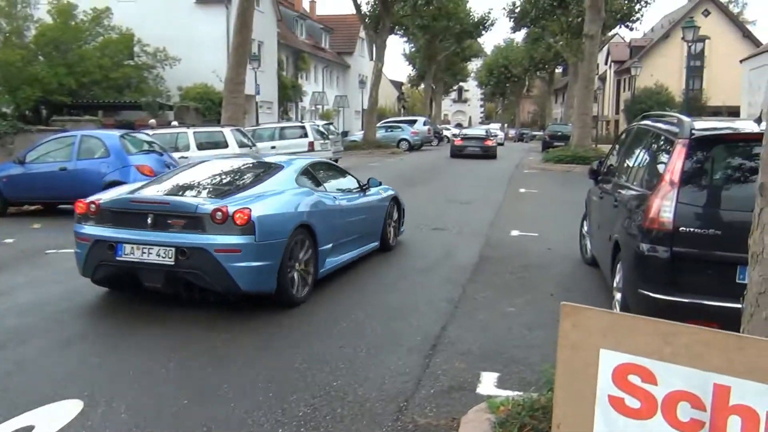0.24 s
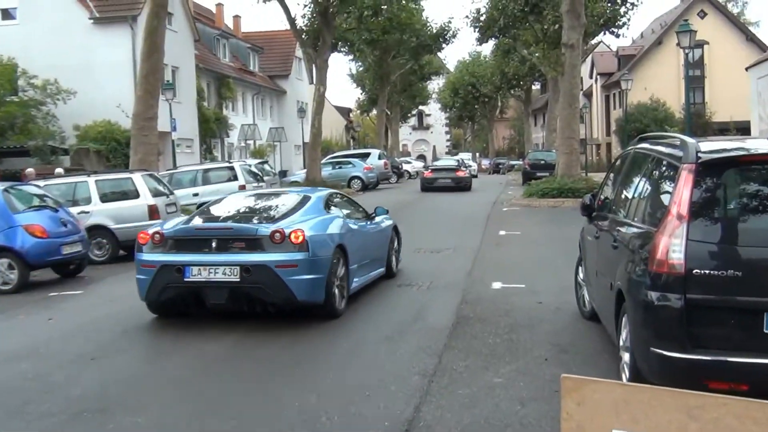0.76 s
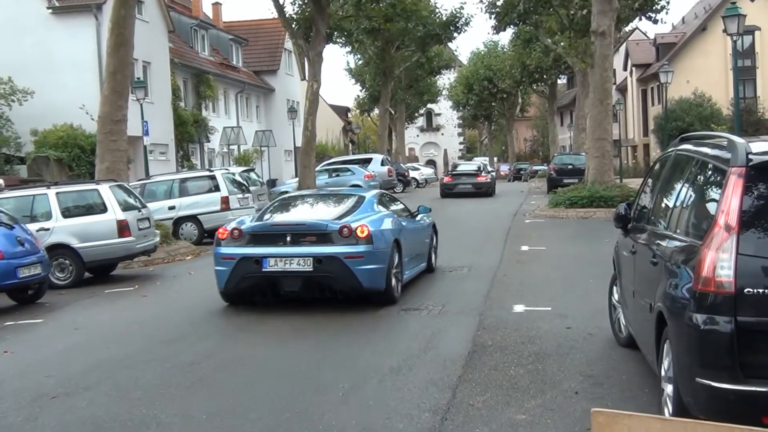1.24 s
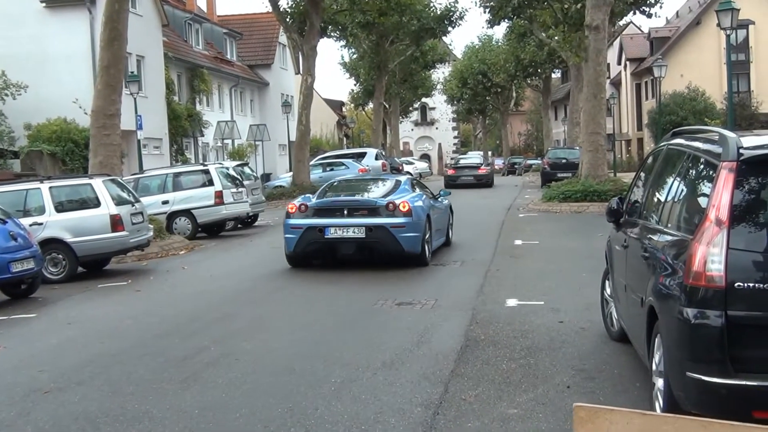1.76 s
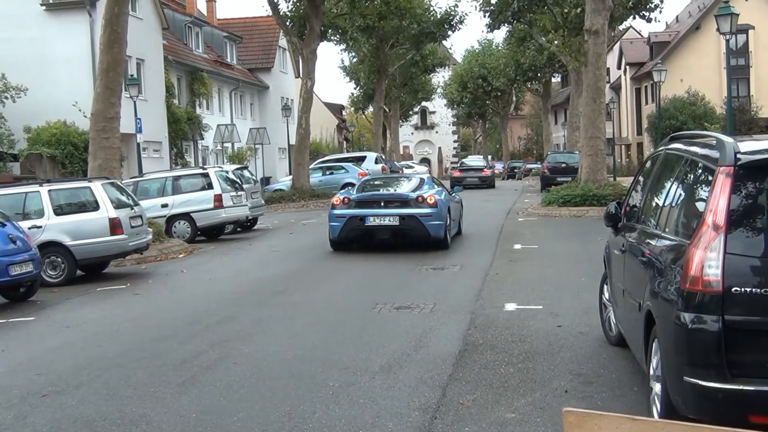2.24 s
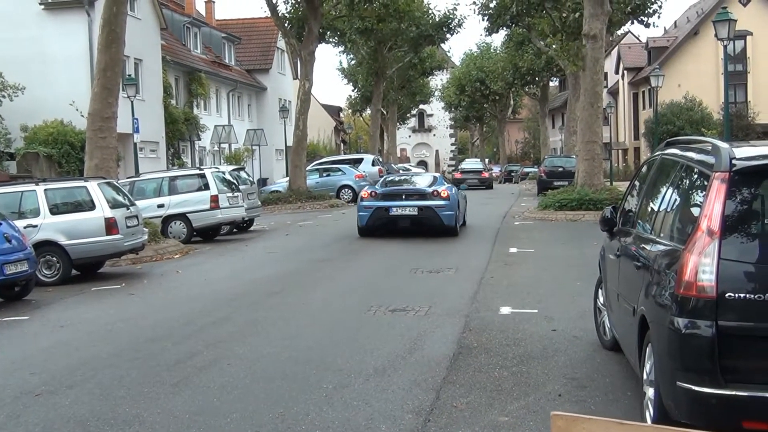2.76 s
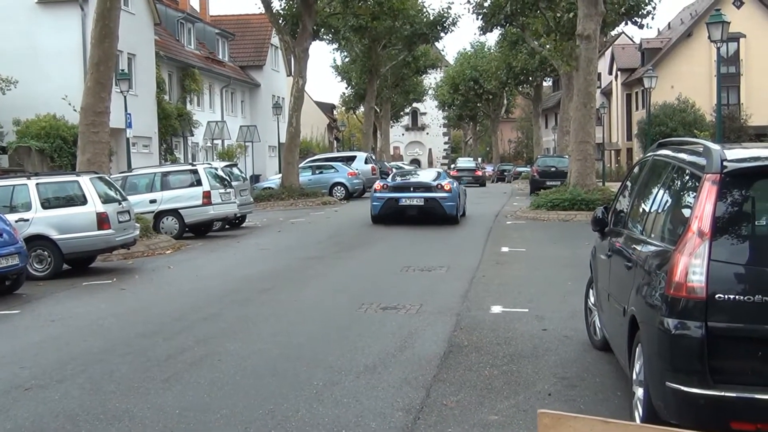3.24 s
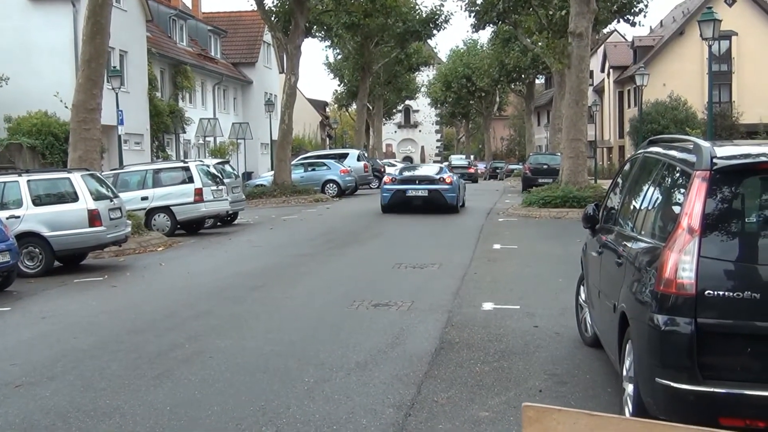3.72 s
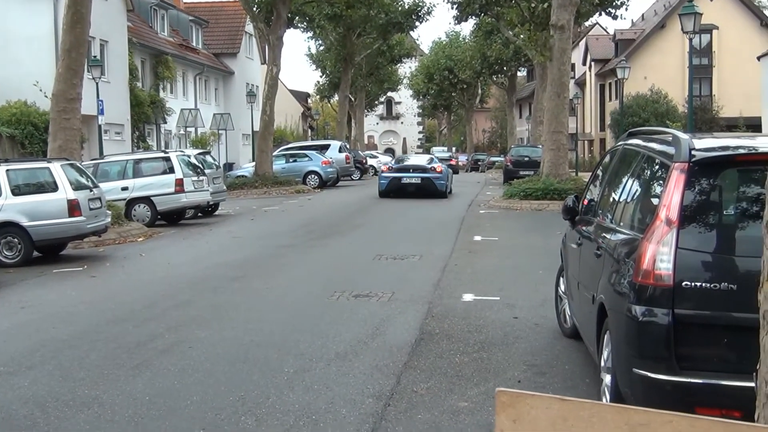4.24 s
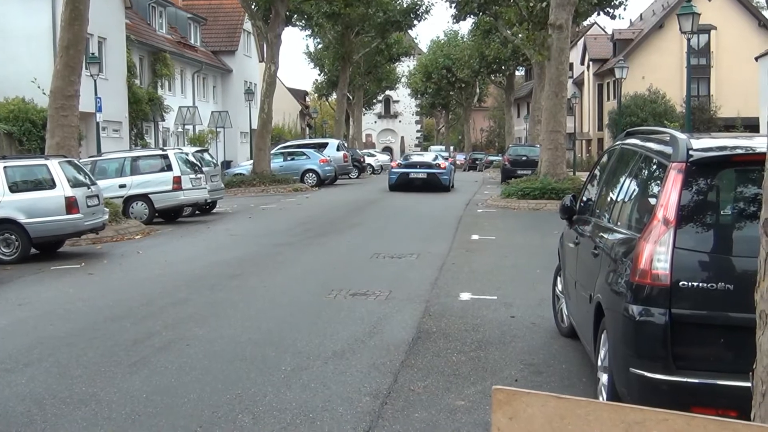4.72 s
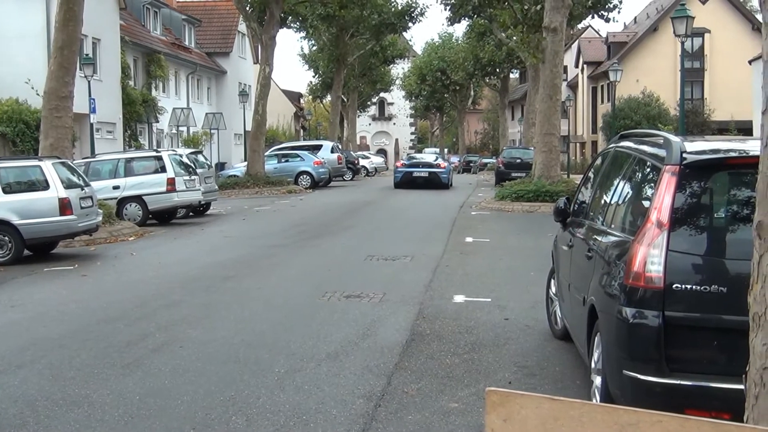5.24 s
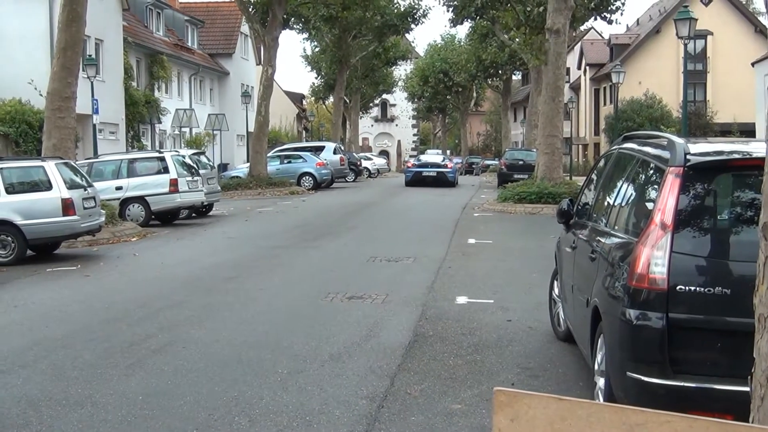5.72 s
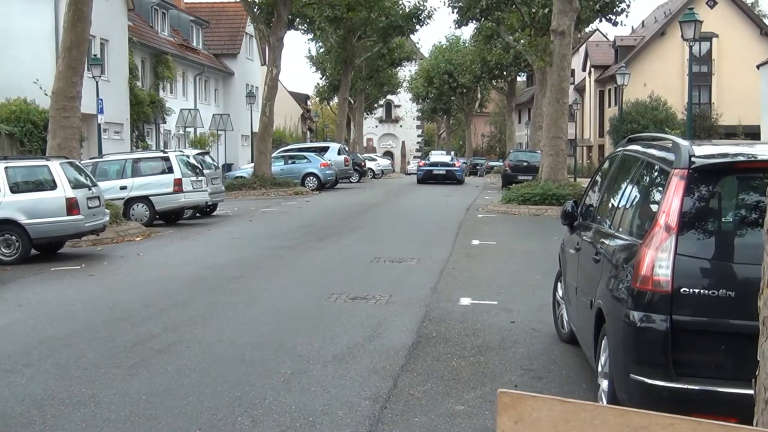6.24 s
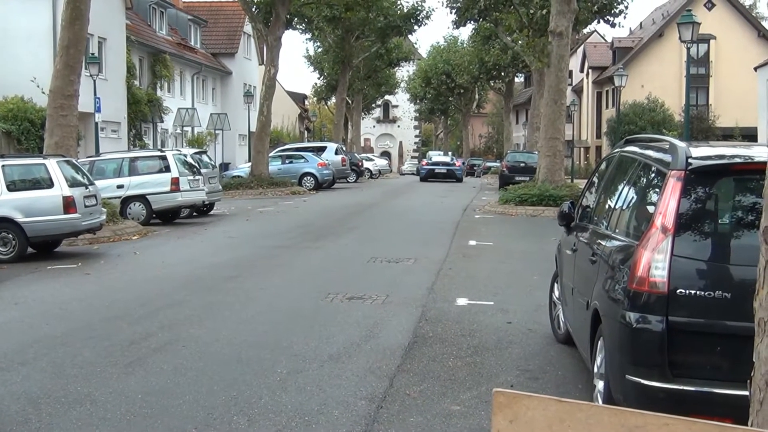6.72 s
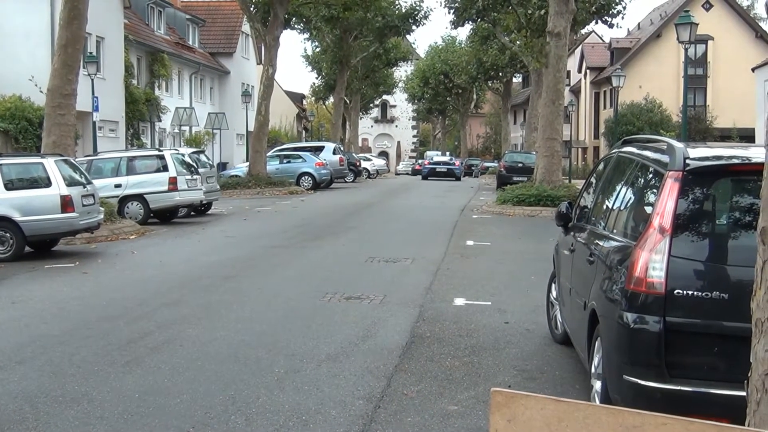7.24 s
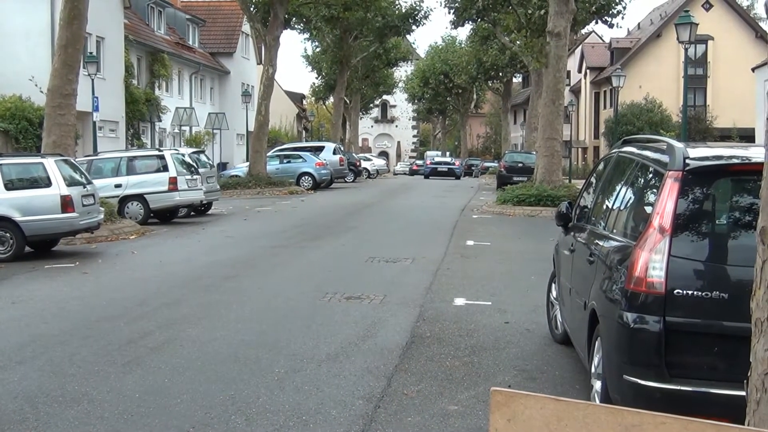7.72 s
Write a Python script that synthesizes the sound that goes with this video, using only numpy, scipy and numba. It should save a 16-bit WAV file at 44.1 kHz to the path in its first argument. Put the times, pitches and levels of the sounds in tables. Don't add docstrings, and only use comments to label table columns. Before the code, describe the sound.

Loud, raspy V8 engine climbs in pitch, cuts briefly for a lurching gear change, then resumes lower over tyre thumps, street roar and faint sparrow chirps.

```python
import sys
import numpy as np
from scipy import signal
from scipy.fft import rfft, irfft, next_fast_len
from scipy.io import wavfile
from scipy.ndimage import uniform_filter1d
from numba import njit

SR = 44100
rng = np.random.default_rng(int(sys.argv[2]) if len(sys.argv) > 2 else 0)


def decibels_to_gain(level_db):
    exponent = np.asarray(level_db, float) / 20
    return 10 ** exponent


def output_pcm(signal):
    pcm = np.clip(np.atleast_2d(signal).T, -1, 1) * 32767
    wavfile.write(sys.argv[1], SR, np.round(pcm).astype(np.int16))


N = 351918
TIME = np.arange(N) / SR

# (time [s], shaft frequency [Hz], level [dB])
DRIVE = [(0, 60.7, -11.5), (.6, 62.93, -10), (1.0, 65.3, -9.5), (1.8, 72.56, -7.5), (2.35, 76.2, -8),
         (2.55, 77.34, -7), (2.8, 76.63, -9), (3.375, 50.8, -24.5), (3.75, 52.44, -23.5),
         (4.125, 54.09, -15.5), (4.75, 57.46, -9), (5.2, 58.94, -17), (5.45, 60.27, -15.5),
         (6.0, 62.62, -10), (6.45, 63.52, -10.5), (7.05, 64.1, -9), (7.35, 62.83, -11.5),
         (7.98, 63.35, -12.5)]
# (time [s], shaft frequency [Hz], level [dB])
UPSHIFT = [
    (2.859, 76.25, -9),
    (2.94, 66, -14.5),
    (2.98, 66.7, -14.5),
    (3.02, 59.3, -15),
    (3.059, 55.8, -19),
    (3.16, 60.1, -15),
    (3.211, 55.81, -12.5),
    (3.261, 51.96, -21),
    (3.31, 49.85, -33),
]
# (middle time [s], length [s], level [dB])
STUMBLES = [
    (2.852, .035, -9),
    (2.912, .018, -9),
    (2.965, .02, -5),
    (3.02, .05, -8),
    (3.145, .02, -4),
    (3.295, .025, -10),
]
# (frequency [Hz], width [Hz], level [dB])
PIPE_MODES = [(65, 39, -30.5), (152, 12, -19.5), (178.7, 13.1, -23), (222, 44.6, -23.5),
              (284.5, 37.7, -25.5), (319.8, 24.6, -24), (349.2, 35, -25), (402.1, 31.7, -28),
              (461.4, 24, -32), (609.5, 32, -37.5), (682, 62, -39), (735, 44, -38), (857, 52, -36),
              (965, 84, -38)]
# (shaft order, low gear level [dB], pulling level [dB], cruising level [dB])
ORDER_LEVELS = [(1, 0, -1, -4.5), (3, -.5, 4, -6.5), (4, -.5, 1.5, -2.5), (5, 0.7, -9, -2.5),
                (6, -0.6, -10, 3.5), (7, -2.5, -9, -8), (8, -3, -3.5, -5.5), (9, -4, -6.5, -4.5),
                (10, -0.5, 2, -1.5), (11, -8, -2, -0.6), (12, -9.5, -3.5, -4.5), (13, -5.5, -10, -9.5),
                (14, -9, -2.5, -3.5), (15, -5, -4, -5.5), (16, -4.5, -7, -1)]
# (frequency [Hz], width [Hz], level [dB])
BANK_NOTCHES = [
    (209.3, 20, -12.5),
    (270, 15, -6.5),
]
# (middle time [s], length [s], shaft order, level [dB])
FACADE_LIFTS = [(0.47, .75, 12, 13), (0.17, .4, 11, 9.5), (2.4, .5, 10, 5.5), (1.3, .3, 11, 8.5),
                (2.4, 0.38, 15, 14), (1.1, .5, 13, 9), (1.2, .4, 6, 3.5), (2.5, 0.46, 13, 6),
                (2.4, .08, 3, 6), (2.94, 0.065, 4, 8.5), (3.0, .12, 3, 11), (3.253, .08, 4, 6.5),
                (1.4, .6, 4, 2.5), (7.6, 0.76, 6, 3), (6.5, 0.36, 4, 3.5), (3.58, .25, 3, 2),
                (3.55, .4, 4, 3.5), (4.7, .4, 5, -5), (.6, 0.25, 10, 6), (3.16, 0.34, 4, 1),
                (4.36, .45, 15, 8), (5.3, .7, 14, 6.5), (5.37, 0.21, 3, 3.5), (5.38, 0.55, 16, 7.5),
                (5.81, 0.51, 1, 7.5), (6.25, .25, 3, 9), (6.5, 0.28, 6, 3), (4, 0.26, 3, -7),
                (4.0, .5, 1, -13), (.65, 0.46, 1, -8)]
# (time [s], main order frequency [Hz], level [dB])
AHEAD_NEAR = [
    (0, 208, -19),
    (.08, 215.7, -17.5),
    (.3, 227, -18),
    (.6, 246.4, -19.5),
    (.66, 246, -21),
    (.71, 246, -18.5),
    (.8, 237, -19.5),
    (.95, 212, -31),
    (1.05, 204, -42),
]
# (multiple of main order, level under main order [dB])
AHEAD_PARTIALS = [(0.751, -10.5), (1.502, -13.5), (1.999, -23), (2.501, -24)]
# (time [s], shaft frequency [Hz])
AHEAD_FAR = [
    (5.0, 62.5),
    (5.6, 64.3),
    (6.6, 66.3),
    (7.98, 68.2),
]
AHEAD_FAR_SWELLS = {1: [(6.8, 0.63, -35), (7.3, 0.2, -32), (7.8, 0.42, -27)], 1.5: [(5.6, .6, -35),
                    (6.6, 0.46, -38.5), (7.8, 0.45, -37)], 4: [(7.5, 0.6, -28.5)]}
# (time [s], peak level [dB], ringing frequency [Hz])
TYRE_BUMPS = [(0.471, -27, 1023), (4.318, -18.5, 834.6), (4.871, -18.5, 1140), (4.893, -18, 890.8),
              (4.91, -14.5, 905), (5.533, -14, 850), (5.579, -12, 809), (5.602, -15, 794),
              (5.611, -18, 820.5), (5.675, -17.5, 806.5), (6.99, -23, 830.5), (7.017, -12, 830),
              (7.034, -16, 992)]
# (time [s], peak level [dB], decay [s], middle frequency [Hz])
BRIGHT_TICKS = [(.775, -36, .006, 8000), (.805, -38, .006, 8000), (1.341, -43, 0.0043, 9400),
                (2.84, -52, .01, 8000), (3.148, -36.5, 0.013, 6500), (3.164, -30.5, .03, 4070),
                (3.22, -35, 0.058, 3597), (3.268, -47.5, 0.012, 10510), (3.328, -50, 0.0041, 11000),
                (5.03, -47, .005, 10500), (7.974, -39, 0.0051, 9980)]
# (time [s], length [s], start frequency [Hz], end frequency [Hz], level [dB])
SPARROW_CHIRPS = [
    (6.508, 0.067, 5430, 4355, -47),
    (7.004, 0.061, 4920, 4480, -46),
    (7.456, 0.076, 4193, 4570, -43),
]
# (time [s], level [dB])
STREET_ROAR = [(0, -35), (.8, -36), (1.0, -39.5), (1.4, -41.5), (2.5, -42), (2.8, -40), (3.0, -41),
               (3.6, -42), (4.4, -36), (4.85, -35), (5.2, -32.5), (5.8, -31), (6.0, -33.5), (6.8, -35),
               (7.5, -33.5), (7.98, -31.5)]
# (frequency [Hz], level per Hz [dB])
ROAR_SPECTRUM = [(25, -27.5), (50, -26.5), (90, -19.5), (170, -10), (270, -16), (400, -14), (560, -23),
                 (680, -17.5), (850, -19), (1300, -26), (2000, -30), (4000, -42.5), (8300, -52.5),
                 (16000, -74)]
# (middle time [s], length [s], level [dB])
LORRY_SWELLS = [
    (3.9, 0.96, -29.5),
]
# (middle time [s], length [s], level [dB])
DRONE_SWELLS = [
    (3.0, 0.31, -35.5),
    (5.0, 1.8, -41.5),
]
# (time [s], level [dB])
HUM_SWELLS = [(.98, -36), (1.928, -36), (2.75, -36), (3.29, -33.5), (3.93, -36.5), (4.5, -32.5),
              (4.8, -31.5), (5.05, -31.5), (5.9, -24.5), (6.2, -30.5), (6.6, -29.5), (6.93, -34.5),
              (7.401, -28.5)]


def curves(rows):
    s, *columns = np.transpose(rows)
    return [np.interp(TIME, s, c) for c in columns]


def walk(rate):
    k = int(SR / rate)
    steps = np.repeat(rng.standard_normal(N // k + 1), k)
    return 1.28 * uniform_filter1d(uniform_filter1d(steps, k), k)[:N]


def bell(s, length):
    return np.exp(-(2 * (TIME - s) / length) ** 2)


def swell(rows):
    return np.sqrt(decibels_to_gain(-49.5) ** 2 + sum(decibels_to_gain(2 * db) * bell(s, length) for s, length, db in rows))


def band(x, lo_hz, hi_hz):
    return signal.sosfilt(signal.butter(2, [lo_hz, min(hi_hz, SR / 2.2)], "band", fs=SR, output="sos"), x)


def tone(turns, multiple, db, flutter_db, wobble):
    phase = 2 * np.pi * (multiple * turns + rng.random()) + wobble * multiple * walk(30)
    return np.sqrt(2) * decibels_to_gain(db + flutter_db * walk(9)) * np.sin(phase)


def resonance(hz, centre_hz, width_hz):
    return 1 / (1 + (2 * (hz - centre_hz) / width_hz) ** 2) ** 2


def engine(shaft_hz, turns, bank_db):
    dip_db = sum(db * bell(s, length) for s, length, db in STUMBLES)
    out = tone(turns, 2, bank_db + dip_db, 0.45, 0.03)

    pull, cruise = (np.clip((TIME - s) / .3 + .5, 0, 1) for s in (2.96, 5.8))
    roar_db = curves(STREET_ROAR)[0]
    bark_db = 11 * bell(2.75, .24)
    lift_db = 0.58 * (roar_db - np.mean(roar_db)) + bark_db
    shut = bell(3.14, .42)

    for order, low_db, pull_db, cruise_db in ORDER_LEVELS:
        odd = order % 2
        hz = order * shaft_hz
        pipes = sum(decibels_to_gain(2 * db) * resonance(hz, mode_hz, width) for mode_hz, width, db in PIPE_MODES)
        db = low_db + (pull_db - low_db) * pull + (cruise_db - pull_db) * cruise
        db += sum(sing_db * bell(s, length) for s, length, which, sing_db in FACADE_LIFTS if which == order)
        db += odd * sum(notch_db * resonance(hz, mid_hz, width) for mid_hz, width, notch_db in BANK_NOTCHES)
        db += (order >= 8) * lift_db - 3.5 * shut
        db -= 8 * (shut + .5 * odd * pull) * np.abs(walk(18))
        grain_db = (order >= 6) * min(.2 * order, 2.4) * walk(50)
        level_db = db + grain_db + 0.67 * walk(2.967)
        out += np.sqrt(pipes + decibels_to_gain(-49.5) ** 2) * tone(turns, order, level_db, 1.5, .03)
    return out


def car_ahead():
    hz, db = curves(AHEAD_NEAR)
    turns = np.cumsum(hz) / SR
    fade = np.clip((AHEAD_NEAR[-1][0] - TIME) / 0.08, 0, 1)
    early = tone(turns, 1, db, 0.39, .04) + tone(turns, .5, -27, 0, .054)
    early += sum(tone(turns, order, db + under_db, 2.7, 0.047) for order, under_db in AHEAD_PARTIALS)

    turns = np.cumsum(curves(AHEAD_FAR)[0]) / SR
    late = sum(swell(rows) * tone(turns, order, 0, 0.5, 0.03) for order, rows in AHEAD_FAR_SWELLS.items())
    return fade * early + (TIME > AHEAD_FAR[0][0]) * late


def tyre_bumps():
    out = np.zeros(N)
    for s, db, hz in TYRE_BUMPS:
        age = np.maximum(TIME - s, 0)
        cycles = hz * age + .5 * (1 - np.exp(-age / .0008))
        shape = (1 - np.exp(-age / .0003)) * np.exp(-age / .0018)
        out += decibels_to_gain(db + 5) * shape * np.sin(2 * np.pi * cycles)
    return out


def bright_ticks():
    out = np.zeros(N)
    for s, db, decay, hz in BRIGHT_TICKS:
        shape = decibels_to_gain(db) * (TIME >= s) * np.exp(-np.maximum(TIME - s, 0) / decay)
        burst = shape * rng.standard_normal(N)
        for _ in range(2):
            burst = band(burst, hz / 1.7, hz * 1.45)
        out += burst
    return out


def sparrow():
    out = np.zeros(N)
    for s, length, from_hz, to_hz, db in SPARROW_CHIRPS:
        part = np.clip((TIME - s) / length, 0, 1)
        hz = (from_hz + (to_hz - from_hz) * part) * (1 + .075 * walk(700))
        out += decibels_to_gain(db) * np.sin(np.pi * part) * np.sin(2 * np.pi * np.cumsum(hz) / SR)
    return out


@njit
def walls(x, lags, gain, damp):
    line, soft, out = np.zeros((8, 8192)), np.zeros(8), np.zeros(len(x))
    for i in range(len(x)):
        total = 0.
        for k in range(8):
            soft[k] += (1 - damp) * (gain[k] * line[k, (i - lags[k]) & 8191] - soft[k])
            total += soft[k]
            out[i] += soft[k] * (1 - 2 * (k % 2))
        for k in range(8):
            line[k, i & 8191] = x[i] + soft[k] - total / 4
    return out


def house_fronts(near):
    lags = rng.integers(1200, 6000, 8)
    return decibels_to_gain(-25) * walls(near, lags, decibels_to_gain(-60 * lags / SR / 0.38), 0.9)


def gas_puffs(turns):
    firing = (2 * turns).astype(int)
    sizes = decibels_to_gain(3 * rng.standard_normal(firing[-1] + 1))
    puff = .8 + .55 * sizes[firing] * np.exp(-(2 * turns % 1) / .35)
    return uniform_filter1d(puff, size=30)


def roar(turns):
    roar_db = curves(STREET_ROAR)[0]
    rumble_db = -30.3 + 0.52 * (roar_db - np.mean(roar_db)) + 0.8 * walk(4)
    hiss_db = roar_db - 8.6 - 8 * np.interp(TIME, (3.03, 5.63), [0, 1])
    swings_db = np.array([rumble_db, roar_db, hiss_db])

    hz, colour_db = np.transpose(ROAR_SPECTRUM)
    size = next_fast_len(N)
    octave = np.log2(np.maximum(np.arange(size // 2 + 1) * SR / size, 1))
    noise = rfft(rng.standard_normal(size)) * decibels_to_gain(np.interp(octave, np.log2(hz), colour_db))
    noise /= np.std(band(irfft(noise, size), 1086, 2205))

    puff = gas_puffs(turns)
    offset_db = np.mean(roar_db) - np.mean(swings_db, axis=1)
    air_db = 0.42 * (hiss_db - np.mean(hiss_db))
    share_octaves = np.log2([250, 900, 1600, 5000])
    share_rows = [0.92, 0, 0.0, 0.013], [0.038, 0.97, 0.97, 0.0], [0.012, 0.04, 0.0016, 0.97]
    out = np.zeros(N)
    for centre in np.arange(4, 14.5, .5):
        piece = irfft(noise * np.clip(1 - 2 * np.abs(octave - centre), 0, 1), size)[:N]
        shares = [np.interp(centre, share_octaves, row) for row in share_rows]
        level_db = np.dot(shares, swings_db + offset_db[:, None])
        level_db = level_db + air_db * max(centre - 12.5, 0) + walk(10)
        out += decibels_to_gain(level_db) * piece * puff ** shares[1]
    return out


def distant_traffic():
    lorry = swell(LORRY_SWELLS) * tone(69.7 * TIME, 1, 0, 2.5, 0.6)
    return lorry + swell(DRONE_SWELLS) * tone(377.4 * TIME, 1, 0, 1.1, 1.1)


def steady_hum():
    hum_gain = swell([(s, 0.19, db) for s, db in HUM_SWELLS])
    return hum_gain * tone(466.4 * TIME, 0.97, 0, 2.8, 0.45)


def scene():
    shaft_hz, bank_db = curves(sorted([*DRIVE, *UPSHIFT]))
    turns = np.cumsum(shaft_hz) / SR
    near = engine(shaft_hz, turns, bank_db) + car_ahead() + tyre_bumps() + bright_ticks() + sparrow()
    return (near + house_fronts(near) + roar(turns) + distant_traffic() + steady_hum())[None]


def roll_off(x):
    return signal.sosfilt(signal.butter(12, 16310, fs=SR, output="sos"), x)


def record(dry):
    faded = dry * np.minimum(TIME / .004, 1)
    mic = signal.sosfilt(signal.butter(2, 48, "high", fs=SR, output="sos"), faded)
    mic = mic + 0.27 * band(mic, 8400, 8900)
    over = np.maximum(np.abs(mic) - .6, 0)
    mic = mic - np.sign(mic) * (over - .3 * np.tanh(over / .3))
    mic = signal.sosfilt(signal.ellip(10, .2, 60, 15680, fs=SR, output="sos"), mic)
    return roll_off(mic)


dry = scene()
out = record(dry)
output_pcm(out)
```